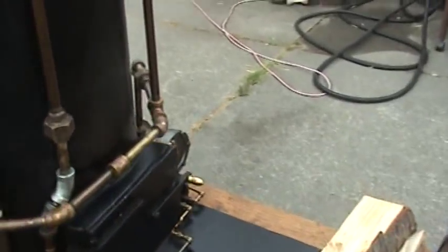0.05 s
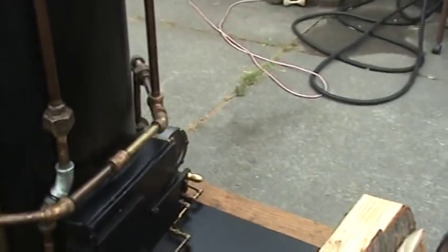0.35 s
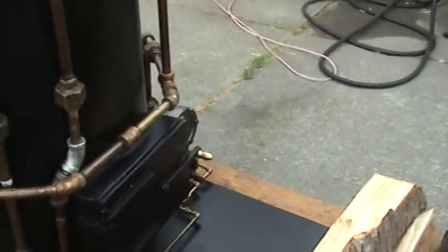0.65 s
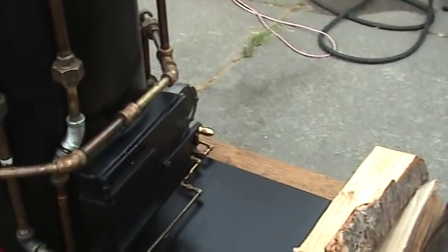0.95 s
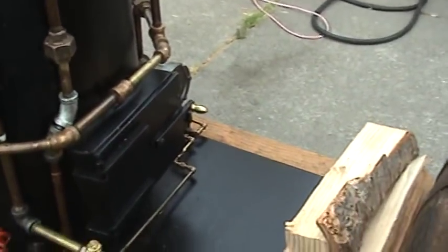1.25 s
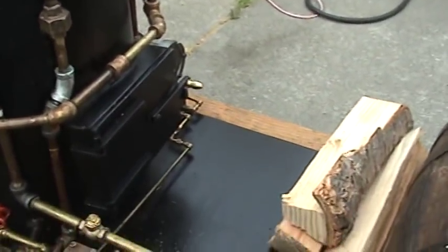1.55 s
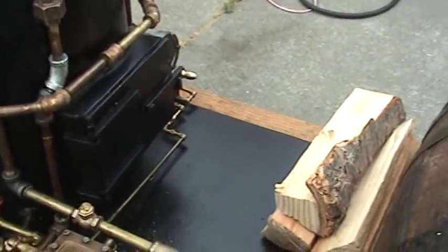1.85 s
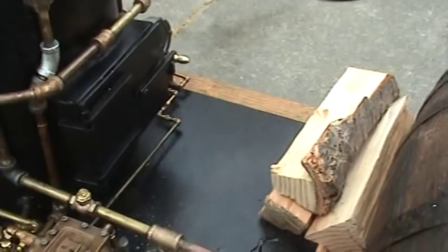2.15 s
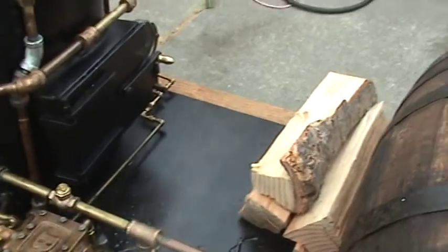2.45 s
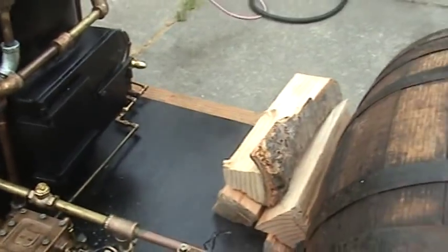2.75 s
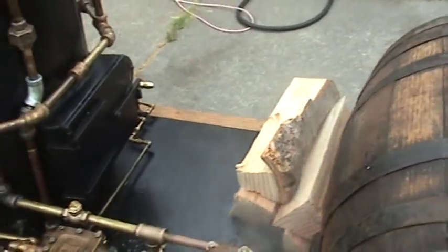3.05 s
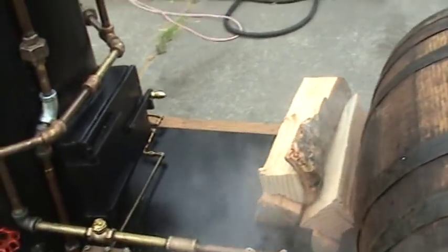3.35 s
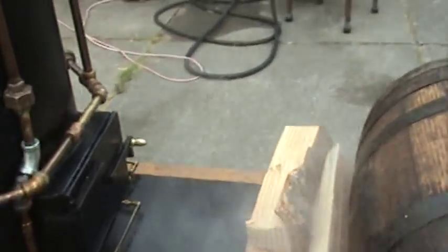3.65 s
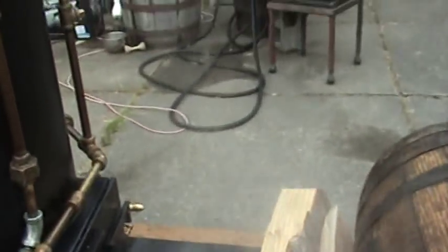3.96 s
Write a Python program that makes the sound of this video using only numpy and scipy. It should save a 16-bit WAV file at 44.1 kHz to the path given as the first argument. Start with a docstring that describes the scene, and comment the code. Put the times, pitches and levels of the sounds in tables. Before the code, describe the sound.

A small steam engine chuffs and knocks steadily, releasing a hissing burst of steam.

```python
"""Small steam engine in a yard

An engine turns about 4.5 times a second, close by, over a low rumble and a spitting leak.
Each turn brings an impact that excites metal resonances, then a hollow chuff and a softer return puff,
both pulses of turbulent flow. A cock opens and blows a hissing jet for two seconds, slightly to the left."""
import sys
import numpy as np
from scipy import signal
from scipy.fft import rfft, irfft
from scipy.io import wavfile
from scipy.ndimage import uniform_filter1d

SR = 44100
rng = np.random.default_rng(int(sys.argv[2]) if len(sys.argv) > 2 else 0)


def master_out(mix):
    """Clip the mix to full scale and print it as 16-bit PCM to the path in sys.argv[1]."""
    frames = np.transpose(np.atleast_2d(mix))
    ceiling = np.clip(frames, -1, 1)
    pcm = np.round(ceiling * 32767).astype(np.int16)
    wavfile.write(sys.argv[1], SR, pcm)


N = 176400
t = np.arange(N) / SR
decay_t = t[:SR // 2]  # time axis of impulse responses


def amp(db):
    """Amplitude ratio of a level in decibels."""
    return 10 ** (np.asarray(db) / 20)

def unit(x):
    """Normalisation to rms 1."""
    return x / np.sqrt(np.mean(x ** 2))

def curve(rows):
    """Linear interpolation of (time_s, value) rows."""
    return np.interp(t, *np.array(rows).T)

def gains(points):
    """Magnitude response through (frequency_hz, level_db) points."""
    hz, db = np.array(points, float).T
    return amp(np.interp(np.log(np.fft.rfftfreq(N, 1 / SR) + 1e-9), np.log(hz), db))

def colour(x, points):
    """Zero-phase filtering by a magnitude response."""
    return irfft(rfft(x) * gains(points), N)

def resonate(x, rows):
    """Parallel resonators, given as (pitch_hz, bandwidth_hz, level_db)."""
    return sum(amp(db) * signal.lfilter(*signal.iirpeak(hz, hz / width, SR), x) for hz, width, db in rows)

def walk(rate_hz):
    """Slow random modulation: smoothed noise of rms 1."""
    span = int(SR / rate_hz)
    return unit(uniform_filter1d(uniform_filter1d(rng.standard_normal(N), span), span))

def swells(times, dbs, rise_s, fall_s):
    """Burst envelopes: Gaussian rise to each peak, then exponential decay."""
    out = np.zeros(N)
    for at, db in zip(times, dbs):
        a, b = np.searchsorted(t, [at - 3 * rise_s, at + 8 * fall_s])
        age = t[a:b] - at
        out[a:b] += amp(db) * np.exp(-np.where(age < 0, (age / rise_s) ** 2, age / fall_s))
    return out

def strike(times, dbs, response):
    """Superposition: each blow launches one copy of an impulse response."""
    blows = np.zeros(N)
    blows[(times * SR).astype(int)] = amp(dbs)
    return signal.fftconvolve(blows, response)[:N]

def droplets(per_s, scatter_db, fall_s):
    """Shot-noise envelope of tiny random bursts, rms 1."""
    arrivals = rng.random(N) < per_s / SR
    sizes = amp(scatter_db * np.minimum(rng.exponential(size=N), 3))
    return unit(signal.lfilter([1], [1, -np.exp(-1 / (fall_s * SR))], arrivals * sizes))

# stereo width of the engine: frequency_hz, side_to_mid_db
ENGINE_SPREAD = [(100, -12), (1500, -20.5), (2400, -11), (6000, -5.5), (9500, 1), (13000, -8)]
def noise(spread=ENGINE_SPREAD):
    """Partial coherence: the channels share a mid signal and take a side signal in opposite phase."""
    mid, side = rng.standard_normal((2, N))
    side = colour(side, spread)
    return unit(np.array([mid + side, mid - side]))

def turbulence(spectrum, envelope=1, spread=ENGINE_SPREAD):
    """Source and filter: stereo noise, modulated and then spectrally shaped, rms 1."""
    return unit(colour(noise(spread) * envelope, spectrum))


# spectrum of the drone: frequency_hz, level_db
RUMBLE_SPECTRUM = [(44, -63), (56, -11), (68, -23), (95, -7), (150, -3.5), (204, 5), (245, -8), (292, -0.5),
                   (340, -2.5), (392, -9), (440, -8), (650, -6), (1000, -12.5), (1800, -13), (3000, -32)]
# its envelope: time_s, level_db
RUMBLE_LEVELS = [(0, -26.5), (.6, -28), (.85, -26), (1.1, -32), (1.5, -39), (2.1, -42), (2.6, -40),
                 (3.0, -39), (3.4, -37.5), (3.8, -33.5), (4, -34.5)]
def rumble():
    """Structural vibration: boiler and frame drone as low-frequency noise."""
    return turbulence(RUMBLE_SPECTRUM) * amp(curve(RUMBLE_LEVELS))

# spectrum of the fizz: frequency_hz, level_db
FIZZ_SPECTRUM = [(1000, -8), (2300, 1), (3200, 8), (3900, 5.5), (4900, 5.5), (5500, 4.5), (6800, 3.5),
                 (8000, -1), (11000, -13.5), (15500, -25)]
# spectrum of ticks and spits: frequency_hz, level_db
SPIT_SPECTRUM = [(1000, 3.5), (3000, -3), (5000, -1), (9700, -2.5), (10700, 0.5), (11800, -5.5),
                 (15500, -26)]
# envelope of the leak: time_s, level_db
LEAK_LEVELS = [(0, -32.5), (.7, -31.5), (1.3, -34), (2.9, -42), (3.25, -42), (3.5, -38), (4, -39)]
def leak():
    """Two-phase flow: droplets modulate the noise of wet steam, so it fizzes and ticks."""
    fizz = turbulence(FIZZ_SPECTRUM, 1 + amp(-2) * droplets(per_s=94, scatter_db=7, fall_s=.0086))
    ticks = turbulence(SPIT_SPECTRUM, droplets(per_s=110, scatter_db=3, fall_s=.0015))
    return (fizz + amp(-6) * ticks) * amp(curve(LEAK_LEVELS))

# spurts of wet steam: start_s, length_s, level_db
SPITS = [(0.01, 0.022, -25), (0.191, 0.027, -22.5), (0.246, 0.022, -26.5), (0.418, 0.0054, -25),
         (0.668, 0.021, -27.5), (0.746, 0.0051, -20), (2.889, 0.0046, -30.5), (3.466, 0.021, -35.5)]
def spits():
    """Intermittent flow: dense spray starts abruptly, holds and decays."""
    rise_s, fall_s = .00053, .0068
    gate = sum(amp(db) * np.clip((t - at) / rise_s, 0, 1) * np.exp(-np.maximum(t - at - length, 0) / fall_s)
               for at, length, db in SPITS)
    return gate * turbulence(SPIT_SPECTRUM, droplets(per_s=700, scatter_db=2.5, fall_s=.0036))

# one knock and chuff a turn: knock_s, thud_db, clack_db, ring_db, chuff_db
TURNS = [(.055, -8, -13.5, -30, -25), (.275, -7.5, -11.5, -30, -25.5), (.489, -5.5, -13, -27.5, -21.5),
         (.697, -4, -12, -41, -21.5), (.900, -4, -16.5, -35, -23), (1.103, -7.5, -16.5, -37, -27.5),
         (1.318, -14, -18, -40, -30.5), (1.525, -18, -32, -45, -33.5), (1.733, -18.5, -32, -50, -32.5),
         (1.943, -18, -35, -46, -33), (2.156, -16.5, -30, -42, -36.5), (2.387, -16.5, -28, -36, -36.5),
         (2.618, -14, -21.5, -50, -31.5), (2.847, -16.5, -17.5, -41, -29), (3.073, -10, -19.5, -35, -28.5),
         (3.296, -10.5, -20.5, -36, -31.5), (3.534, -11, -15.5, -30.5, -30), (3.776, -8, -13, -37, -28.5)]
knock_s, thud_db, clack_db, ring_db, chuff_db = np.array(TURNS).T
KNOCK_RISE_S, CLACK_LAG_S = .0015, .00047
# modes of the frame: pitch_hz, bandwidth_hz, level_db
FRAME_MODES = [(694, 48, -17.5), (757, 46, -12), (1310, 320, -20.5), (1670, 790, -23)]
def thud():
    """Impact excitation: each knock sounds the frame's damped modes, with a burst of noise."""
    frame = sum(amp(db) * np.sin(2 * np.pi * hz * decay_t) * np.exp(-np.pi * width * decay_t)
                for hz, width, db in FRAME_MODES)
    frame = signal.lfilter(*signal.butter(2, 254, "high", fs=SR), frame)
    grit = turbulence(CHUFF_SPECTRUM) * swells(knock_s, thud_db, KNOCK_RISE_S, fall_s=.0064)
    return strike(knock_s, thud_db, frame) + .24 * grit

# modes of the linkage: pitch_hz, bandwidth_hz, initial_db, final_db
LINKAGE_MODES = [(1810, 760, -3, -3), (3020, 160, 14, 10), (3250, 80, 1, 11), (3910, 600, 5.5, 8),
                 (4670, 540, 1, 4), (6070, 250, 3.5, 8), (11200, 1400, -12, -10)]
MOVE_S = 1.9  # the modes change balance as the microphone moves along the engine
def clack():
    """Backlash: play in the linkage closes once a turn, and the rattle excites its resonances."""
    drift_per_s, scatter = .012, .01  # fractions of pitch
    grit = noise()
    out = np.zeros((2, N))
    for at, db in zip(knock_s, clack_db):
        tuning = 1 + drift_per_s * at + scatter * rng.standard_normal(len(LINKAGE_MODES))
        modes = [(hz * ratio, width, np.interp(at, [0, MOVE_S], dbs))
                 for (hz, width, *dbs), ratio in zip(LINKAGE_MODES, tuning)]
        near = abs(t - at) < .05
        burst = swells([at + CLACK_LAG_S], [db], KNOCK_RISE_S, fall_s=.0037)[near]
        out[:, near] += resonate(grit[:, near] * burst, modes) / resonate(grit[:, near], modes).std()
    return signal.lfilter(*signal.butter(2, 10200, fs=SR), out)

# modes of a metal part: pitch_hz, t60_s, level_db
RING_MODES = [(3344, 0.24, 1), (3050, 0.071, -1)]
def ring():
    """Free vibration: a struck metal part rings thinly, its level flickering."""
    metal = sum(amp(db) * np.sin(2 * np.pi * hz * decay_t) * np.exp(-np.log(1000) * decay_t / t60)
                for hz, t60, db in RING_MODES)
    return strike(knock_s + CLACK_LAG_S, ring_db, metal) * amp(3 * walk(150))

def singing():
    """Frictional excitation: the same part rubs under load, and its tone flares around each knock."""
    flicker = amp(3 * walk(60))
    pitch_hz = RING_MODES[0][0] + 45 * walk(200)
    tone = np.sin(2 * np.pi * np.cumsum(pitch_hz) / SR)
    return flicker * tone * swells(knock_s, ring_db - 7, rise_s=.041, fall_s=.087)

# hollow spectrum of the chuff, also of the thud's grit: frequency_hz, level_db
CHUFF_SPECTRUM = [(200, -16), (450, -0.5), (640, 8), (800, 4.5), (1020, 1), (1230, 5), (1450, -3.5),
                  (1850, -0.5), (2300, -14), (15000, -56)]
# spectrum of the chuff's boom: frequency_hz, level_db
BOOM_SPECTRUM = [(35, -47), (110, -9.5), (205, -2.5), (250, -11), (310, 2), (345, -15), (390, 8.5),
                 (440, -18.5), (510, -2), (2000, -42)]
CHUFF_LAG_S, BOOM_DB_PER_DB = .047, 1.09  # hard strokes boom more
def exhaust():
    """Pulsed turbulent flow: a low gulp as the valve opens, a rush, then the chuff and its boom."""
    gulp = swells(knock_s, chuff_db - 6.5, rise_s=.014, fall_s=.015)
    rush = swells(knock_s + .012, chuff_db - 10, rise_s=.0081, fall_s=.011)
    chuff = swells(knock_s + CHUFF_LAG_S, chuff_db, rise_s=.023, fall_s=.007)
    boom_db = chuff_db.mean() + BOOM_DB_PER_DB * (chuff_db - chuff_db.mean()) - 3.5
    boom = swells(knock_s + CHUFF_LAG_S + .013, boom_db, rise_s=.045, fall_s=.025)
    hollow = turbulence(CHUFF_SPECTRUM) * (rush + chuff + gulp / 2) * amp(.93 * walk(170))
    return hollow + turbulence(BOOM_SPECTRUM) * (boom + gulp)

# return strokes: peak_s, level_db
RETURN_STROKES = [(0.198, -23.5), (0.414, -20.5), (0.623, -26.5), (0.827, -24), (1.034, -27.5),
                  (1.245, -28.5), (1.45, -34), (2.08, -39), (2.301, -31), (2.536, -34), (2.763, -31),
                  (2.992, -35), (3.215, -32.5), (3.447, -29), (3.689, -27), (3.925, -27.5)]
# spectrum of their puff: frequency_hz, level_db
PUFF_SPECTRUM = [(100, -31), (300, 1), (700, 13.5), (1000, -2), (1300, 8.5), (1850, 1.5), (2400, -8),
                 (5000, -16), (15000, -31)]
def return_puffs():
    """Transient flow noise: the return stroke releases a short puff."""
    return turbulence(PUFF_SPECTRUM) * swells(*np.array(RETURN_STROKES).T, rise_s=.002, fall_s=.015)

# spectrum of the opening jet: frequency_hz, level_db
JET_EARLY = [(200, -66), (1500, -6), (2600, -4), (5000, -3.5), (5900, -1.5), (6600, -4.5), (9000, -2.5),
             (12000, -7.5), (15500, -21)]
# spectrum of the broadened jet: frequency_hz, level_db
JET_LATE = [(200, -43), (1500, -11), (2500, -6), (4300, -4), (5400, -3), (7000, -1), (8700, -5),
            (13000, -6), (15500, -11)]
# stereo width of the jet: frequency_hz, side_to_mid_db
JET_SPREAD = [(2000, -54), (4000, -22), (7500, -2.5), (9500, -5.5), (11500, -13), (15000, -14)]
# envelope of the steam flow: time_s, level_db
JET_LEVELS = [(.7, -44), (.8, -27.5), (.83, -24), (1.05, -21), (1.4, -21), (2.1, -20), (2.39, -20.5),
              (2.47, -25.5), (2.54, -31), (2.74, -34), (2.82, -44), (2.92, -62)]
# steady peaks that colour the steam hiss: pitch_hz, half_width_hz, boost_db
JET_PEAKS = [(3060, 94, 3), (4880, 63, 4), (9040, 230, 8), (10130, 190, 7), (10920, 260, 5.5),
             (12040, 260, 5.5)]
# three gliding peaks: time_s, low_hz, middle_hz, high_hz
GLIDE_PITCHES = [(1.0, 5900, 7250, 8070), (1.35, 5860, 7200, 8260), (1.75, 5720, 6980, 8250),
                 (2.08, 5750, 7070, 8000), (2.28, 5300, 7200, 8250), (2.6, 4770, 6900, 8180)]
# their shapes, low to high: half_width_hz, boost_db
GLIDE_SHAPES = [(300, 7.5), (360, 8.5), (280, 9.5)]
def jet():
    """Jet noise: turbulent steam hisses, coloured by spectral peaks that flatten as it broadens."""
    broadened = curve([(1, 0), (2.06, 1)])
    hiss = np.sqrt(1 - broadened) * turbulence(JET_EARLY, spread=JET_SPREAD)
    hiss += np.sqrt(broadened) * turbulence(JET_LATE, spread=JET_SPREAD)
    bin_hz, frame_s, spectra = signal.stft(hiss, SR, nperseg=1024)
    at, *glides = np.array(GLIDE_PITCHES).T
    peaks = JET_PEAKS + [(np.interp(frame_s, at, hz), *shape) for hz, shape in zip(glides, GLIDE_SHAPES)]
    boost_db = sum(db * np.exp(-((bin_hz[:, None] - hz) / width) ** 2) for hz, width, db in peaks)
    boost_db *= 1 - .21 * np.interp(frame_s, t, broadened)
    steam = signal.istft(spectra * amp(boost_db), SR)[1][:, :N]
    flutter_db = .52 * walk(35)
    return unit(steam) * amp(curve(JET_LEVELS) + flutter_db)

# resonances of the closing cock: pitch_hz, bandwidth_hz, level_db
CLOSING_MODES = [(1880, 380, 7.1), (3300, 1200, 2.3), (4720, 150, 3.2)]
def closing_cock():
    """Resonant filtering: the hiss turns hollow as the cock closes."""
    hollow = unit(resonate(noise(JET_SPREAD), CLOSING_MODES))
    return hollow * swells(times=[2.72], dbs=[-32.5], rise_s=.3, fall_s=.04)

YARD_T60_S, FIRST_ECHO_S = .3, .004
def yard(x):
    """Reverberation: short scattered echoes from boiler, barrel and ground join the direct sound."""
    decay = np.exp(-np.log(1000) * decay_t / YARD_T60_S) * (decay_t > FIRST_ECHO_S)
    tail = rng.standard_normal((2, len(decay_t))) * decay
    tail = tail + 2.8 * tail[::-1]  # the channels share part of their echoes
    tail = signal.lfilter(*signal.butter(1, 4000, fs=SR), tail)
    tail /= np.sqrt(np.sum(tail ** 2, axis=1, keepdims=True))
    return x + amp(-9) / 2 * signal.fftconvolve(x, tail, axes=1)[:, :N]

def scene():
    """Superposition of engine and escaping steam; only the knocks reverberate."""
    engine = yard(clack() + thud() + ring()) + singing() + exhaust() + return_puffs() + rumble()
    return engine + leak() + spits() + jet() + closing_cock()

# level difference at the microphone: frequency_hz, left_minus_right_db
MIC_BALANCE = [(60, -4), (250, 1.2), (1500, 0.5), (3500, 0.5), (6000, 3), (7200, 3), (8800, 10.5),
               (10300, 9.5), (12000, 5.5), (15000, 1.5)]
# phase difference: frequency_hz, left_lead_rad
MIC_LEAD = [(1600, 0), (4500, 0.45), (6500, 0.39), (8200, 1.3), (9500, 1.25), (11000, 0)]
TOP_HZ = 15850
def record(dry):
    """Stereo localisation: treble reaches the left capsule earlier and stronger; a low-pass cuts the top."""
    lead_rad = np.interp(np.fft.rfftfreq(N, 1 / SR), *np.array(MIC_LEAD).T)
    half_lead = np.exp(.5j * lead_rad)
    balance = gains(MIC_BALANCE)
    capsules = np.array([balance * half_lead, 1 / half_lead]) * 2 / (1 + balance)
    stereo = irfft(rfft(dry) * capsules, N)
    return signal.sosfilt(signal.ellip(12, .2, 80, TOP_HZ, fs=SR, output="sos"), stereo)


dry = scene()
out = record(dry)
master_out(out)
```